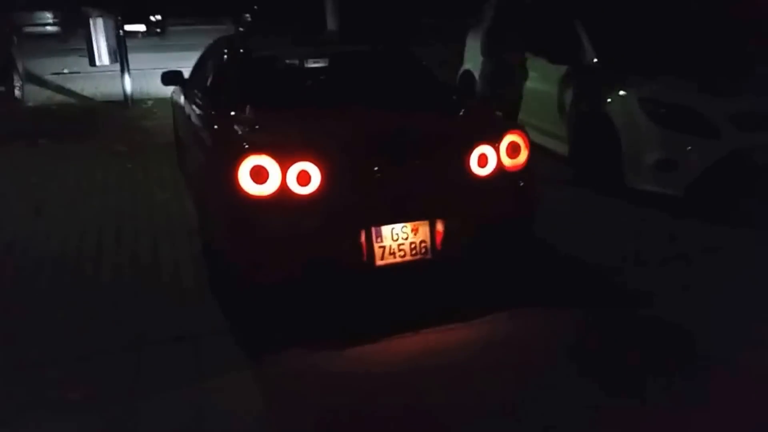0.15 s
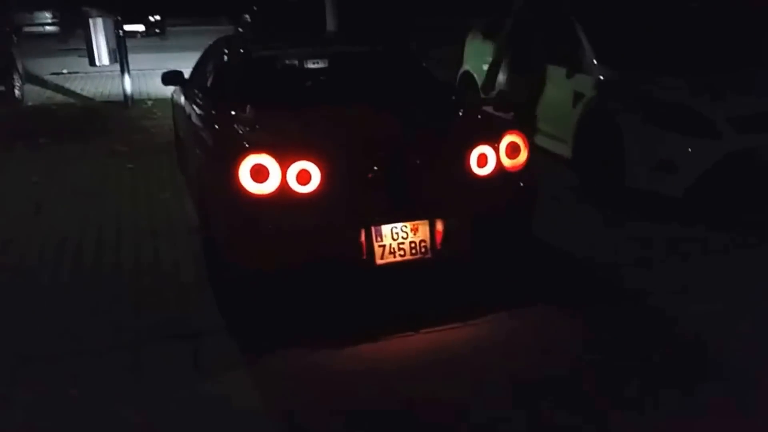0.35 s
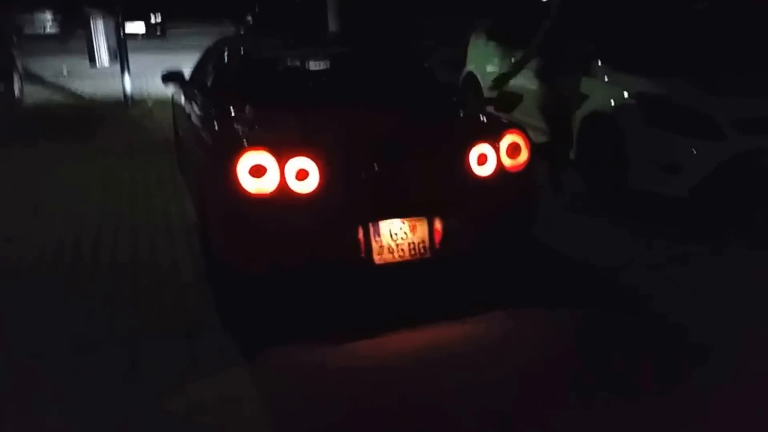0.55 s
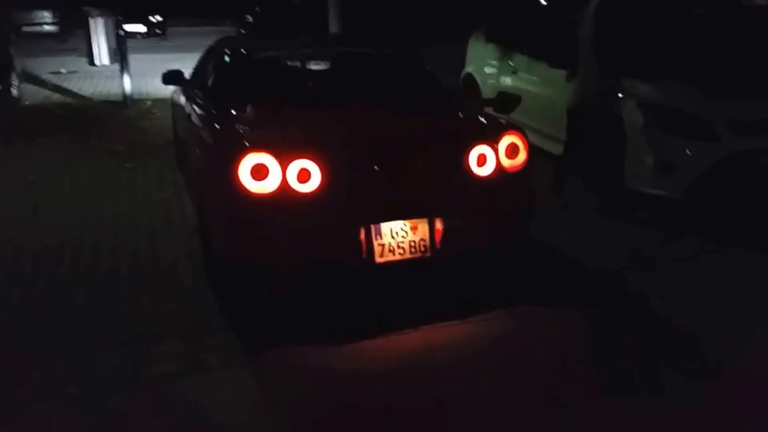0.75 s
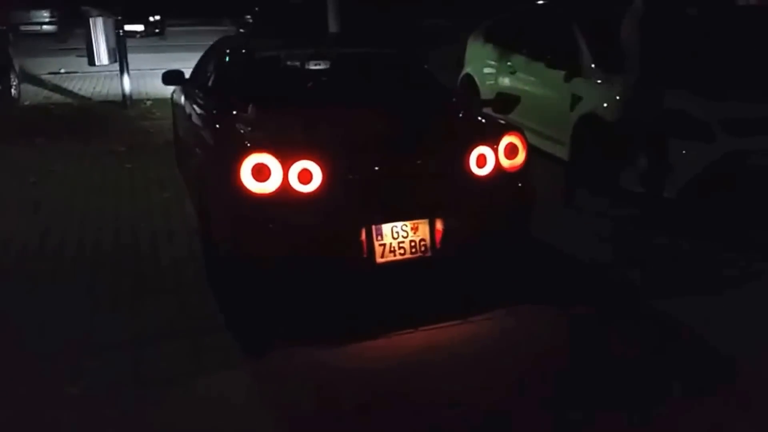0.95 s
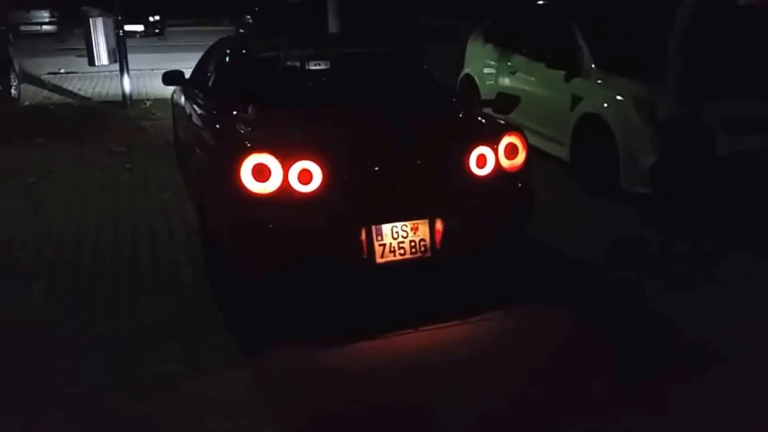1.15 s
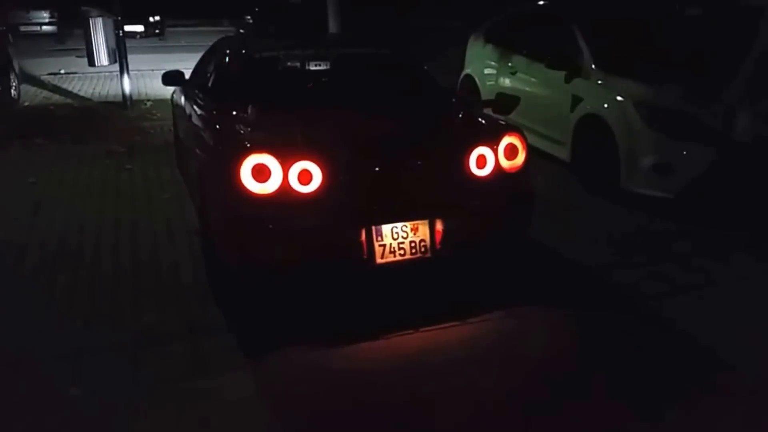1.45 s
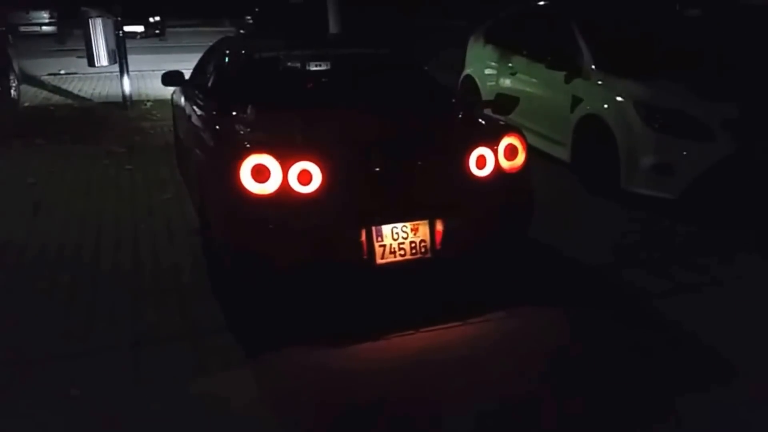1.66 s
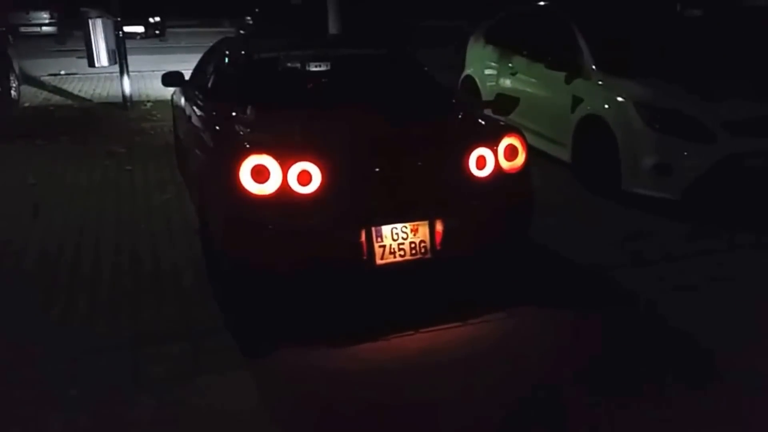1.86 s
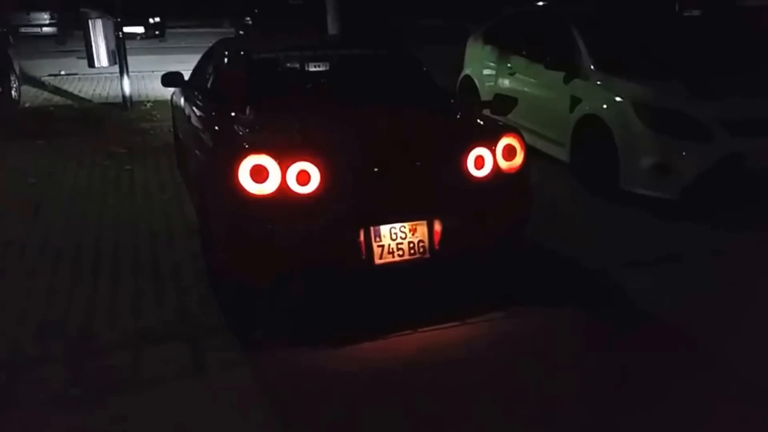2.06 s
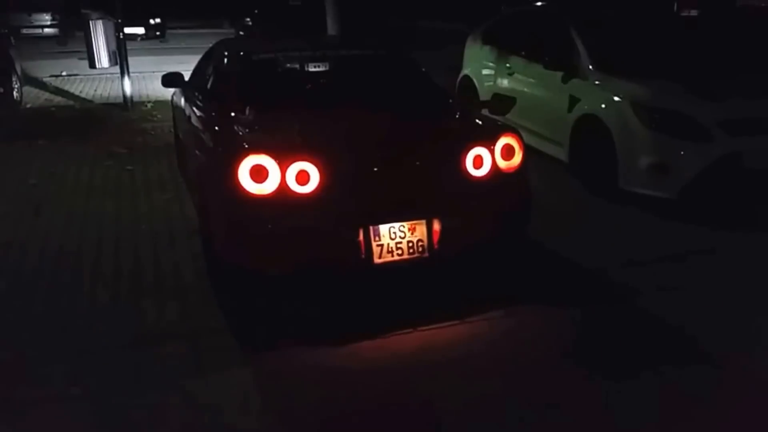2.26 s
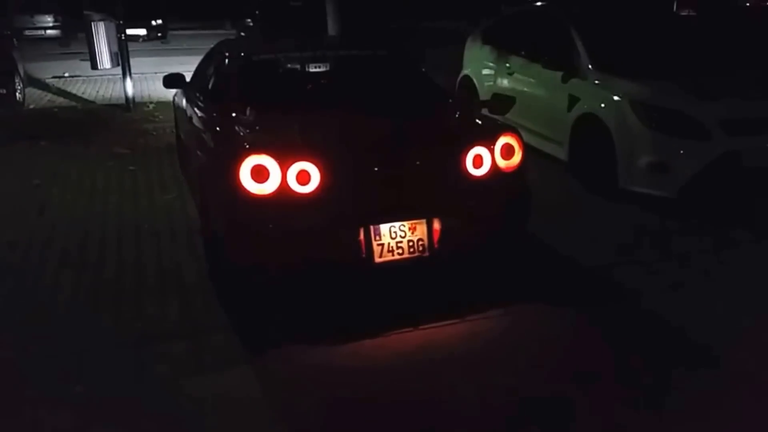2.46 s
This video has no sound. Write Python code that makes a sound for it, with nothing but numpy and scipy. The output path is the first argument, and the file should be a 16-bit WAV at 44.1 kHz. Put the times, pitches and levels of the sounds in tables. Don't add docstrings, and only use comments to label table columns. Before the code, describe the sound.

A six-cylinder car engine idles low and lumpy for about 1.3 seconds, with soft exhaust thumps, light valve ticks, faint gas hiss and body rattle. It then revs steeply, the thumps merging into a rising, rough drone with rushing gas. At about 2.35 seconds dull backfire booms burst out, followed from 2.5 by sharper, louder cracks until the end. Close outdoor phone pickup, distorted on peaks, brighter on the right.

```python
import sys
import numpy as np
from scipy import signal
from scipy.fft import rfft, irfft, next_fast_len
from scipy.io import wavfile
from scipy.ndimage import uniform_filter1d

SR = 44100
rng = np.random.default_rng(int(sys.argv[2]) if len(sys.argv) > 2 else 0)


def dump_mix(stems):
    frames = np.atleast_2d(stems).T
    limited = np.clip(frames, -1, 1)
    pcm = np.round(limited * 32767).astype(np.int16)
    wavfile.write(sys.argv[1], SR, pcm)


def natural_amplitude(level_db):
    exponent = np.asarray(level_db, float) / 20
    return 10 ** exponent


N = 115542
TIME_S = np.arange(N) / SR
IDLE_HZ = 52
CUT_S = 2.35


def at_hz(points, hz):
    table_hz, level_db = np.array(points)[:, :2].T
    return np.interp(np.log(hz + 1), np.log(table_hz), level_db)


def colour(x, points):
    size = next_fast_len(N + 2000)
    gain = natural_amplitude(at_hz(points, np.arange(size // 2 + 1) * SR / size))
    return irfft(rfft(x, size) * gain, size)[..., :N]


def peak(x, hz, width_hz):
    r = np.exp(-np.pi * width_hz / SR)
    poles = [1, -2 * r * np.cos(2 * np.pi * hz / SR), r * r]
    return signal.lfilter([(1 - r * r) / 2, 0, (r * r - 1) / 2], poles, x + 1e-18)


def peaks(x, hz, width_hz, times):
    for _ in range(times):
        x = peak(x, hz, width_hz)
    return x


def cut(x, hz, kind, order):
    return signal.sosfilt(signal.butter(order, hz, kind, fs=SR, output="sos"), x + 1e-18)


def clicks(s, gain):
    i = np.round(np.asarray(s) * SR).astype(int)
    ok = (i >= 0) & (i < N)
    return np.bincount(i[ok], np.asarray(gain)[ok], N)


def dying(x, t60_s):
    return signal.lfilter([1], [1, -natural_amplitude(-60 / (t60_s * SR))], x + 1e-18)


def drift(rate_hz):
    return np.interp(TIME_S * rate_hz, np.arange(400), rng.standard_normal(400))


# (time [s], firing rate [Hz])
SPEED = [(0, 47.9), (.8, 47.85), (1.2, 47.2), (1.31, 48.6), (1.38, 52.7), (1.44, 59.5), (1.55, 74.8),
         (1.66, 93.3), (1.77, 115.1), (1.83, 129), (1.91, 147.5), (2.0, 167.2), (2.1, 185), (2.14, 195),
         (2.2, 212.9), (2.27, 230), (2.35, 248.3), (2.62, 243)]


def crankshaft():
    first_cylinder_s = .2130
    hz = np.interp(TIME_S, *np.transpose(SPEED))
    turns = np.cumsum(hz) / SR
    return hz, turns - turns[int(first_cylinder_s * SR)]


# (thump [dB], thump lag [ms], low ring [dB], high ring [dB], ring lag [ms])
CYLINDERS = [(3, .2, -20, 6.5, 5.9), (-4, 0, .7, 5.1, 3.2), (4.6, -.3, 13.8, 5.5, -2.6),
             (1.2, .8, 11.9, 4.5, -.8), (-4.4, -.7, 8.2, 11.6, 1.2), (-3.6, .2, 5.7, -7, 5.7)]
# (frequency [Hz], width [Hz])
PIPE_RINGS = [(236, 18), (270, 21)]


def firings(hz, turns):
    pulse_db, pulse_spread_db, lag_spread_s = 36.5, 1.0, .0001
    thump_fade_db_per_octave, ring_fade_db_per_octave = 30, 13
    k = np.arange(np.ceil(turns[0]), turns[-1]).astype(int)
    s = np.interp(k, turns, TIME_S)
    luck = rng.standard_normal((5, len(k)))
    thump_db, thump_lag_ms, *rings_db, ring_lag_ms = np.array(CYLINDERS)[k % 6].T
    octaves = np.maximum(np.log2(np.interp(k, turns, hz) / IDLE_HZ), 0)
    db = pulse_db + pulse_spread_db * luck
    thump_s = s + lag_spread_s * luck[3] + thump_lag_ms / 1000
    ring_s = s + lag_spread_s * luck[4] + ring_lag_ms / 1000
    out = clicks(thump_s, natural_amplitude(db[0] + thump_db - thump_fade_db_per_octave * octaves))
    for j, (ring_hz, width_hz) in enumerate(PIPE_RINGS):
        ring_db = db[1 + j] + rings_db[j] - ring_fade_db_per_octave * octaves
        out += peak(clicks(ring_s, natural_amplitude(ring_db)), ring_hz, width_hz)
    out = cut(cut(out, 93, "high", order=4), 255, "low", order=6)
    return cut(out, 414, "low", order=6)


# (multiple of firing rate [1], level [dB])
ORDER_LEVELS = [(1 / 2, -27), (3 / 2, -21), (4 / 2, -13.5), (5 / 2, -30), (6 / 2, -23), (8 / 2, -30)]
# (frequency [Hz], level [dB])
PIPE = [(60, -21.5), (130, -0.5), (190, -1.5), (250, -5), (295, -2), (335, -6.5), (368, -3.5), (400, -41)]


def drone(hz, turns, db):
    wobble_db, wobble_hz = 1.5, 25.485
    above_idle = np.clip((hz - IDLE_HZ) / 12, 0, 1)
    ignition = np.clip((CUT_S - TIME_S) * 50, .2, 1)
    out = np.sin(2 * np.pi * turns)
    for multiple, order_db in ORDER_LEVELS:
        level_db = order_db + at_hz(PIPE, multiple * hz) - db + wobble_db * drift(wobble_hz)
        tone = np.sin(2 * np.pi * multiple * turns + multiple)
        out += natural_amplitude(level_db) * above_idle * ignition * tone
    return np.sqrt(2) * natural_amplitude(db) * out


# (time [s], boom [dB], crack [dB])
BANGS = [
    (2.352, 33, -31),
    (2.3723, 36, -14),
    (2.393, 32.5, -23.5),
    (2.41, 24.5, -36.5),
    (2.429, 27, -39),
    (2.517, 29, -10.5),
    (2.538, 39.5, -6.5),
    (2.5587, 33.5, -14.5),
    (2.5824, 32.5, -10.5),
    (2.604, 29, -21),
]


def tone_dips():
    duck_share, duck_t60_s = .85, .15
    bang_s = np.array(BANGS)[:, 0]
    hit = clicks(bang_s, bang_s > CUT_S + .015)
    return uniform_filter1d(1 - duck_share * np.minimum(dying(hit, duck_t60_s), 1), size=150)


# (frequency [Hz], width [Hz], level [dB])
BOOMS = [(249.5, 96, 6), (108, 50, 5), (165, 90, 8), (282, 76, -13)]


def backfire_booms():
    s, boom_db, _ = np.transpose(BANGS)
    hit = clicks(s, natural_amplitude(boom_db))
    boom = sum(natural_amplitude(d) * peak(peak(hit, f, 3 * w), f, w) for f, w, d in BOOMS)
    burble = peak(rng.standard_normal(N), 193, 160) * (TIME_S > CUT_S)
    return cut(boom + natural_amplitude(2.5) * cut(burble, 70, "high", order=2), 331, "low", order=4)


# (frequency [Hz], density [dB per Hz])
CRACK = [(300, -13.5), (600, 14.5), (950, 7), (1300, -5), (2500, 2.5), (6000, -8.5), (15000, -35.5)]


def backfire_cracks(white):
    lag_s, crack_t60_s, tail_t60_s, tail_db, snap_db = .0029, .004, .073, -10.5, 13
    s, _, crack_db = np.transpose(BANGS)
    hit = clicks(s + lag_s, natural_amplitude(crack_db))
    shape = dying(hit, crack_t60_s) + natural_amplitude(tail_db) * dying(hit, tail_t60_s)
    return colour(white, CRACK) * shape * natural_amplitude(8) - natural_amplitude(snap_db) * peak(hit, 2500, 5000)


# (time [s], level [dB], t60 [s], frequency [Hz])
TICKS = [
    (.001, -36, 0.0042, 8700),
    (.71, -74, .1, 5800),
    (1.085, -60, 0.26, 6050),
    (1.69, -19, 0.065, 986),
    (2.26, -49, .08, 6840),
    (2.355, -22.5, 0.063, 1550),
    (2.549, -36.5, 0.079, 5200),
    (2.577, -21, 0.026, 2340),
]


def stray_ticks(white):
    out = 0
    for s, db, t60_s, hz in TICKS:
        shape = dying(clicks([s], [natural_amplitude(db + 13.5)]), t60_s)
        shape = uniform_filter1d(shape, int(t60_s * SR / 4) + 1)
        out = out + peaks(white * shape, hz, .94 * hz, times=2)
    return out


def gas_puffs(hz, turns):
    steady_share, decay, lag, spread_db = .22, 4, .19, 2.3
    white = rng.standard_normal((2, N))
    luck = rng.standard_normal(600)[np.floor(turns - lag - turns[0]).astype(int) + 1]
    fall = decay * np.minimum(1.04 * IDLE_HZ / hz, 1)
    return white * (steady_share + np.exp(-fall * ((turns - lag) % 1))) * natural_amplitude(spread_db * luck)


# (frequency [Hz], width [Hz], level [dB])
JET = [(602, 260, -8.5), (822, 140, -8), (1570, 310, 0.5), (2209, 200, -6), (2341, 443, 4.5),
       (3140, 167, -11.5), (5523, 690, -21), (7480, 1400, -15), (9400, 980, -28.5)]


def tailpipe_hiss(puffs, db):
    top_hz, top_end_hz, top_opens_db = 5570, 10500, -33
    low = top = 0
    for f, w, d in JET:
        band = natural_amplitude(d) * np.sqrt(300 / w) * peaks(puffs, f, 2 * w, times=2)
        if f > top_hz:
            top = top + band
        else:
            low = low + band
    throttle = natural_amplitude(1.5 * np.minimum(db - top_opens_db, 0))
    jet = cut(low, top_hz, "low", order=4) + cut(top, top_end_hz, "low", order=6) * throttle
    return natural_amplitude(db + 18.5) * jet


def tappets(puffs, hz, db):
    tappet_db, follows, wander_db, fade_db_per_octave = -37.5, .91, 2, 7
    level_db = tappet_db + follows * (db - db[0]) + wander_db * drift(18)
    level_db = level_db - fade_db_per_octave * np.maximum(np.log2(hz / 85), 0)
    return natural_amplitude(level_db) * peaks(puffs, 4860, 2 * 366, times=3)


# (frequency [Hz], width [Hz], level [dB])
RATTLE = [(376.4, 30, -44.5), (463, 88, -46.5), (631, 35, -50), (716, 89, -51.5), (833, 375, -50)]


def body_rattle(turns):
    knock_db, knock_at, knock_width = 7, .24, .035
    white = rng.standard_normal((2, N))
    knock = np.exp(-((turns / 6 % 1 - knock_at) / knock_width) ** 2)
    level = natural_amplitude(knock_db * knock + 3.2 * drift(40))
    rattle = sum(natural_amplitude(d) * np.sqrt(SR / w) * peaks(white, f, 2 * w, times=2) for f, w, d in RATTLE)
    return level * cut(rattle, 3600, "low", order=2)


# (frequency [Hz], density [dB per Hz])
ROAR = [(300, -0.5), (700, 2), (1200, -0.5), (2500, -2), (4200, -12.5), (6000, -15), (10000, -29),
        (14000, -41.5)]


def roar(hz):
    roar_db, rise_db_per_octave, full_hz = -21, 17.5, 158
    rise_db = rise_db_per_octave * np.minimum(np.log2(hz / full_hz), 0)
    return natural_amplitude(roar_db + rise_db + 1.1 * drift(16)) * colour(rng.standard_normal((2, N)), ROAR)


# (time [s], drone [dB], gas hiss [dB])
ENGINE = [(0, -55, -51.5), (1.051, -55.5, -50), (1.3, -46.5, -42.5), (1.441, -26, -32.5),
          (1.58, -17.5, -27.5), (1.659, -14.5, -35), (1.77, -15, -30), (1.839, -12.5, -31.5),
          (1.932, -13.5, -29), (2.082, -3, -35), (2.15, -12, -37), (2.209, -12.5, -35), (2.281, -8, -29.5),
          (2.32, -2.5, -31.5), (2.357, -3.5, -30), (2.374, -13, -32), (2.44, -14, -47.5),
          (2.62, -14.5, -40)]
# (frequency [Hz], level [dB])
LEFT_PORT = [(60, -2), (130, -4.5), (290, -5.5), (640, -9.5), (1410, -14.5), (3100, -24), (6820, -18),
             (15000, -15.5)]


def scene():
    left_lag_samples, left_own_db, level_db = 4, -3.5, 2
    s, *columns = np.transpose(ENGINE)
    drone_db, hiss_db = [np.interp(TIME_S, s, c) for c in columns]
    hz, turns = crankshaft()
    low = firings(hz, turns) + drone(hz, turns, drone_db) * tone_dips() + backfire_booms()
    bang_white = rng.standard_normal((2, N))
    noise = backfire_cracks(bang_white) + stray_ticks(bang_white)
    puffs = gas_puffs(hz, turns)
    noise = noise + tailpipe_hiss(puffs, hiss_db) + tappets(puffs, hz, hiss_db)
    noise = noise + body_rattle(turns) + roar(hz)
    left = low + np.roll(noise[0], left_lag_samples) + natural_amplitude(left_own_db) * noise[1]
    return natural_amplitude(level_db) * np.array([colour(left, LEFT_PORT), low + noise[0]])


def roll_off(x):
    return signal.sosfilt(signal.butter(12, 15850, fs=SR, output="sos"), x)


def record(dry):
    floor_db, mic_low_hz, top, knee = -97, 30, .94, 7.7
    x = cut(dry + natural_amplitude(floor_db) * rng.standard_normal((2, N)), mic_low_hz, "high", order=2)
    mix = x / (1 + np.abs(x / top) ** knee) ** (1 / knee)
    return roll_off(mix)


dry = scene()
out = record(dry)
dump_mix(out)
```